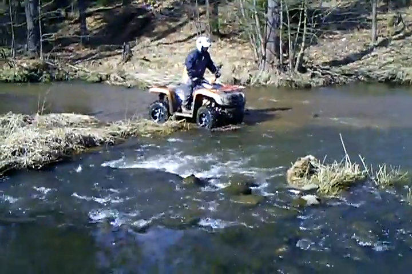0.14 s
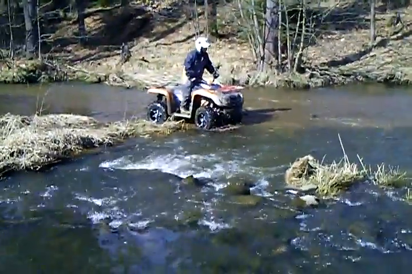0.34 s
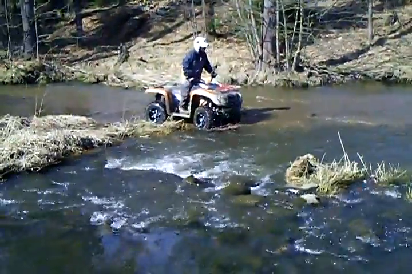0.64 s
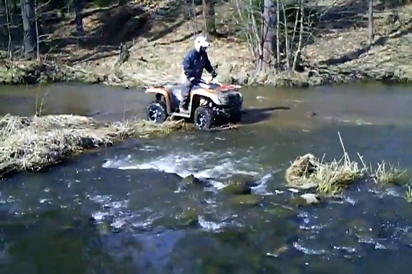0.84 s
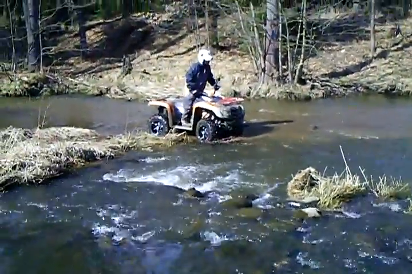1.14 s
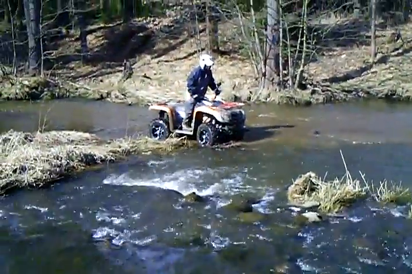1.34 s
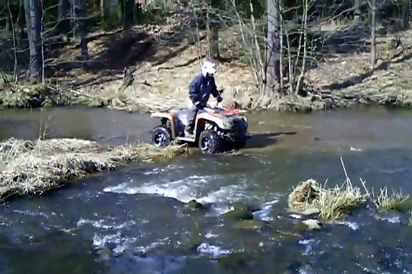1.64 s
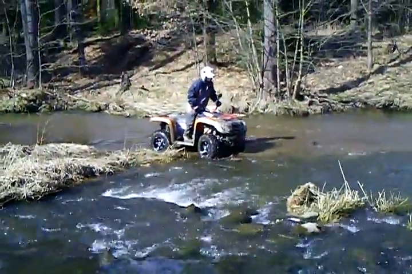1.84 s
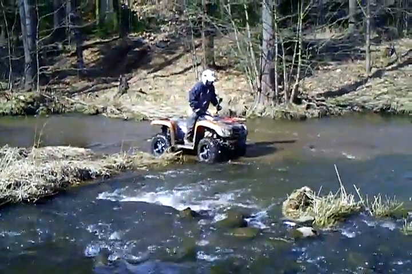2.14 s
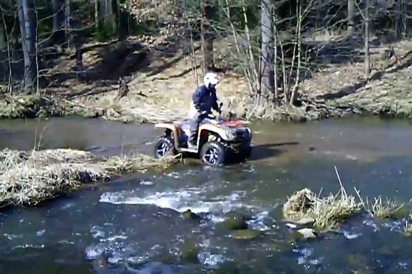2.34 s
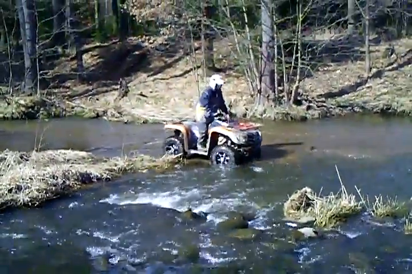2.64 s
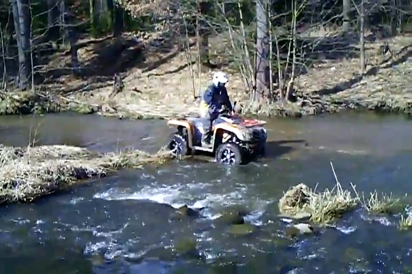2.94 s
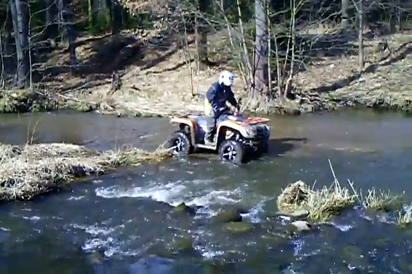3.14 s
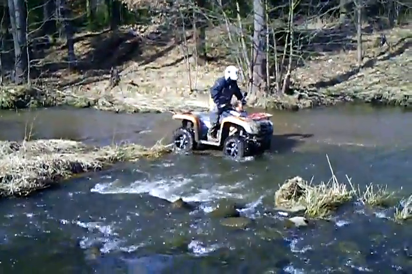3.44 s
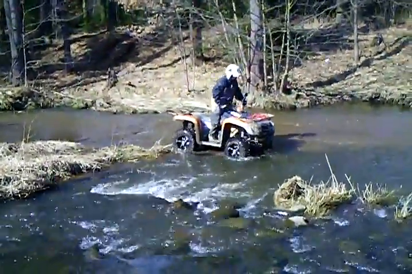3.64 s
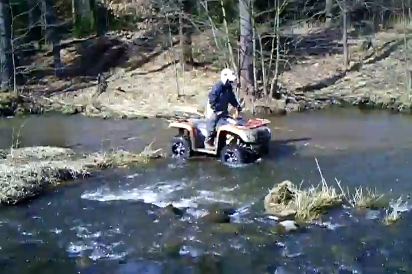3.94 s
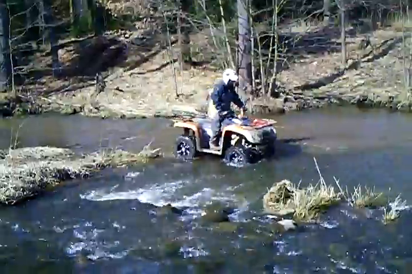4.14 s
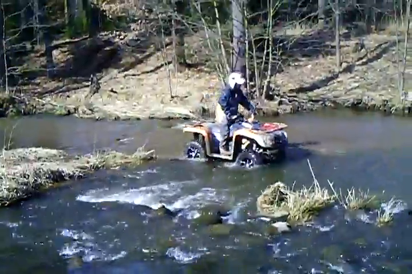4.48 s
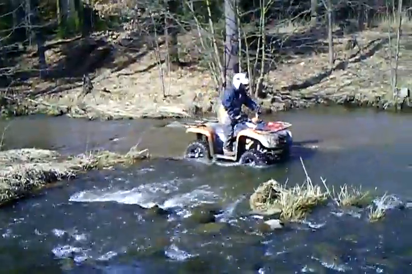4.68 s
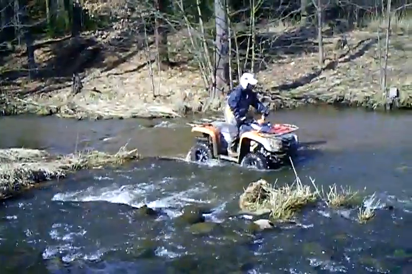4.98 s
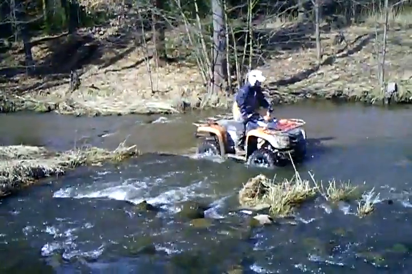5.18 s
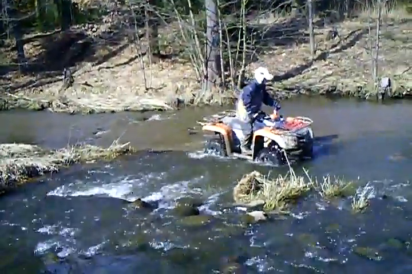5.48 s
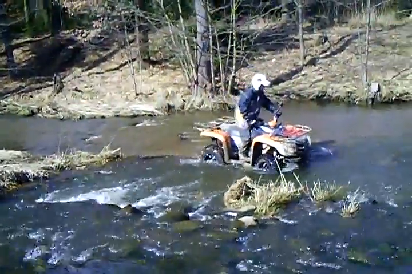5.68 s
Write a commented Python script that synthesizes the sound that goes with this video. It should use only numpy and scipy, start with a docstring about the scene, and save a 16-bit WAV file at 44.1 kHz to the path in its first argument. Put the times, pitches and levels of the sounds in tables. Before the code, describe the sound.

A shallow woodland stream rushes throughout, a wide, patchy wash strongest in the low mids, with rising bubbly gurgles and fine bright spray. Beneath it, a wavering low rumble and two slow idles at about 11 to 13 firings per second beat against each other, the nearer ticking softly each cycle. A single-cylinder quad putters at about 12 firings per second, then opens up from 1.2 to 2.75 s, booming and barking at about 17 with loose clatter. It sinks to idle near 3.2 s, pulls again from 3.7 to 4.7 s at up to nearly 20, drops back around 5.3 s and surges from 5.7 s as the sound ends. A faster, more distant engine blips faintly at 1.6 s, then strongly at 2.0-2.3 and 2.7-3.1 s, with nasal rasps. Tiny high water pings begin at 1.3 s, clustering from 2.7 to 4.5 s. Mono, outdoors, with the extreme treble rolled off.

```python
"""A stream rushes, gurgles and sprays over stones throughout: coloured noise and rising bubble chirps.
Idling engines rumble low underneath (low noise), and two quads idle on the bank from the start, one
ticking: pressure pulses through exhaust resonances. A single-cylinder quad crawls through the water,
its throttle opening near 1.2, 3.7 and 5.7 s. A fourth, faster engine further off is blipped between
1.5 and 3.1 s, rasping in bursts. Water spatters ping from 1.3 s, mostly after 2.6 s: decaying sines."""
import sys
import numpy as np
from scipy import signal
from scipy.fft import rfft, irfft, next_fast_len
from scipy.io import wavfile
from scipy.ndimage import uniform_filter1d, map_coordinates

SR = 44100
rng = np.random.default_rng(int(sys.argv[2]) if len(sys.argv) > 2 else 0)


def voltage_ratio(decibels):
    """Convert decibels (scalar or array-like) to amplitude ratios, 20 dB per decade."""
    exponent = np.asarray(decibels, float) / 20
    return 10 ** exponent


def wrap_up_sound(samples):
    """Save the sound to the file named by the first command line argument, as 16-bit audio."""
    columns = np.atleast_2d(samples).T
    # keep every value between -1 and 1, then stretch to whole-number steps
    tamed = np.clip(columns, -1, 1)
    steps = np.round(tamed * 32767).astype(np.int16)
    wavfile.write(sys.argv[1], SR, steps)


N = 256320

# stream wash, swelling as the quad wades deeper and nearer: time_s, level_db (before surges)
WASH = [(0, -41), (1.6, -41), (2.4, -39.5), (3.6, -40.5), (4.8, -39.5), (5.81, -40)]
# noise colours: frequency_hz, relative density_db (per Hz)
STREAM_COLOUR = [(100, -36), (170, -2.5), (250, 2.5), (330, -1), (420, -4), (600, -2), (780, -2),
                 (1000, -5.5), (1250, -4.5), (1550, -12), (2600, -12), (3050, -14.5), (3350, -20),
                 (6500, -21), (9800, -20), (12500, -21.5)]
ENGINE_RUMBLE_COLOUR = [(3, -18), (16, -8), (38, -8), (70, -5), (95, 0), (130, -3), (160, -14), (220, -40)]
TICK_COLOUR = [(200, -18), (350, 10), (600, -6), (1500, -8.5), (3500, -22), (6000, -13), (10000, -29),
               (12500, -23)]
RASP_COLOUR = [(250, -28), (350, -0.5), (520, -6.5), (720, 7), (1000, -9), (1600, -12), (2250, -4),
               (2900, -9.5), (3400, -18), (6000, -24), (12500, -19)]
CLATTER_COLOUR = [(250, -44), (400, -5), (750, 1), (1300, -3.5), (1600, -7), (2600, -5.5), (3400, -14),
                  (6000, -17.5), (10000, -18), (12500, -20)]
# sharp spatters of water: start_s, level_db (before onset and decay), pitch_hz
SPATTERS = [(1.299, -39, 6350), (1.3838, -38, 6240), (2.6828, -33, 6160), (3.0306, -36, 7340),
            (3.2277, -38, 9400), (3.3613, -38, 8420), (3.4645, -30, 7240), (3.6844, -28.5, 8900),
            (4.176, -32, 7240), (4.3087, -31, 9560), (4.4618, -34, 9880), (4.5237, -30, 10000),
            (5.244, -34, 6130), (5.675, -39, 9500)]
# engine speeds: time_s, firings_per_s
IDLER_NEAR_SPEED = [(0.0, 11.11), (0.8, 11.74), (2.81, 11.43), (3.41, 11.77), (4.01, 11.58), (4.21, 12.04),
                    (4.81, 11.5), (5.01, 12.22), (5.81, 10.68)]
IDLER_FAR_SPEED = [(0.0, 13.22), (0.8, 12.93), (2.0, 13.34), (2.2, 13.06), (3.21, 13.62), (4.01, 12.88),
                   (4.21, 13.53), (5.81, 13.39)]
BLIP_SPEED = [(1.3, 23), (1.6, 26), (1.92, 26.3), (2.04, 29.2), (2.17, 29.8), (2.31, 35.2), (2.45, 33.5),
              (2.6, 28), (2.7, 24.8), (2.83, 33), (2.93, 35.7), (3.0, 33.8), (3.12, 27.6), (3.3, 22.5)]
CRAWLER_SPEED = [(0.0, 11.91), (0.71, 11.74), (0.99, 12.67), (1.28, 16.24), (1.56, 17.51), (2.27, 17.73),
                 (2.55, 17.24), (2.98, 13.83), (3.26, 13.02), (3.54, 13.65), (3.97, 18.68), (4.25, 18.14),
                 (4.68, 19.54), (4.96, 17.58), (5.1, 13.81), (5.39, 11.51), (5.81, 16.83)]
# exhaust resonances: centre_hz, width_hz (of each of two passes), gain_db, polarity (signed factor on the gain)
PIPE_NEAR = [(58, 56.7, -35, -0.93), (107.2, 18.5, -31.5, 0.95)]
PIPE_FAR = [(57.4, 40.5, -36, -1.08), (113.2, 47.5, -38.5, 0.97)]
PIPE_BLIP = [(68, 82, -8, -1.02), (144.8, 44, 1.5, 1), (217, 40, -10.5, -1.06)]
PIPE_CRAWLER = [(97.3, 23.3, 0.3, 1), (179.7, 35, -1.74, 0.95), (273, 41, -12.5, 0.93), (323.4, 33, -18, 1)]
# throttle openings: open_s, close_s, opening_level_db, closing_level_db
BLIPS = [(1.55, 1.85, -39, -38.5), (1.98, 2.33, -31.5, -33), (2.7, 3.1, -30, -31.5)]
CRAWLER_THROTTLE = [(1.17, 2.75, -31, -33.5), (3.7, 4.74, -29.5, -30.5), (5.7, 5.81, -31.5, -28.5)]
# rasp bursts when the blipped engine pulls hard: peak_s, peak_db
RASP_BURSTS = [(2.0, -40.5), (2.3, -43.5), (2.82, -39)]
# microphone treble roll-off: frequency_hz, gain_db
MICROPHONE = [(9800, 0.5), (10500, -2), (11300, -11.5), (12100, -20), (12500, -40)]


def unit(x):
    """Scale to rms 1."""
    return x / np.sqrt(np.mean(x ** 2) + 1e-20)


def curves(rows):
    """One value per sample for each column after the time."""
    time_s, *columns = np.transpose(rows)
    return [np.interp(np.arange(N) / SR, time_s, column) for column in columns]


def wobble(knots_per_s):
    """A smooth random curve through normal random knots."""
    knots = rng.standard_normal(int(N * knots_per_s / SR) + 4)
    return map_coordinates(knots, [np.arange(N) * knots_per_s / SR])


def filtered(x, response):
    """x times a complex response of frequency."""
    size = next_fast_len(N + SR // 2)
    return irfft(rfft(x, size) * response(np.fft.rfftfreq(size, 1 / SR)), size)[:N]


def noise(colour, patchy_db):
    """Coloured noise of rms 1 with random gain patches in time and frequency."""
    bins = signal.stft(rng.standard_normal(N), nperseg=512)[2]
    patches = uniform_filter1d(rng.standard_normal(bins.shape), size=6, axis=0)
    patches = uniform_filter1d(patches, size=8, axis=1)
    patchy = signal.istft(bins * voltage_ratio(patchy_db * unit(patches)), nperseg=512)[1][:N]
    hz, db = np.transpose(colour)

    def response(f):
        return voltage_ratio(np.interp(np.log(f + 1), np.log(hz + 1), db, left=-120, right=-120))

    return unit(filtered(patchy, response))


def openings(rows, idle_db, rise_db_per_s, fall_db_per_s):
    """Throttle level in dB: rises to each opening, runs to its closing level, falls back to idle."""
    t = np.arange(N) / SR
    held_db = []
    for open_s, close_s, open_db, close_db in rows:
        level_db = np.interp(t, [open_s, close_s], [open_db, close_db])
        level_db = level_db - rise_db_per_s * np.maximum(open_s - t, 0)
        held_db.append(level_db - fall_db_per_s * np.maximum(t - close_s, 0))
    return np.maximum(np.max(held_db, axis=0), idle_db)


def exhaust(rate, first, pipe, level_db):
    """One pressure pulse per firing, the first at a share of the cycle, through steep pipe resonances."""
    jitter_s, scatter_db = .00015, .9  # rms
    cycle = np.floor(np.cumsum(rate) / SR - first)
    fired = np.flatnonzero(np.diff(cycle) > 0)
    chance = rng.standard_normal((len(fired), 2))
    at = fired + np.round(jitter_s * SR * chance[:, 0]).astype(int)
    at = np.clip(at, 0, N - 1)
    pulse_db = (level_db + np.zeros(N))[fired] + scatter_db * chance[:, 1]
    pulse = voltage_ratio(pulse_db) * SR / (2 * rate[fired])  # faster firing, smaller pulses

    def ring(f):
        total = 0
        for hz, width_hz, gain_db, polarity in pipe:
            band = 1j * f * width_hz / (hz * hz - f * f + 1j * f * width_hz)
            total = total + polarity * voltage_ratio(gain_db) * band ** 2
        return total

    return filtered(np.bincount(at, pulse, N), ring)


def gate(rate, centre, sharp):
    """A bump once per firing cycle, centred at a share of the cycle; rms 1."""
    phase = 2 * np.pi * (np.cumsum(rate) / SR - centre)
    return unit(np.exp(sharp * np.cos(phase)))


def bubbles(count, centre_hz, spread, cycles, size_db):
    """Small decaying chirps of trapped air, rising in pitch; rms 1."""
    draw, pick = rng.standard_normal((count, 2)), rng.random((count, 2))
    hz = np.clip(centre_hz * np.exp(spread * draw[:, :1]), 200, 11000)
    k = np.arange(700)
    turn = k * hz / SR
    chirp = np.sin(2 * np.pi * turn * (1 + 0.11 * turn / cycles))
    grain = chirp * turn * np.exp(-3 * turn / cycles)
    grain *= voltage_ratio(-size_db * np.log(1 - pick[:, :1]))  # a few much louder
    at = (pick[:, 1:] * N).astype(int) + k
    return unit(np.bincount(at.ravel(), grain.ravel(), N + len(k))[:N])


def spatters():
    """Drops hitting stone or metal: a ping of a few milliseconds."""
    onset_s, decay_60db_s = 0.00042, 0.0069
    out, t = np.zeros(N + SR), np.arange(400) / SR
    for start_s, level_db, pitch_hz in SPATTERS:
        envelope = voltage_ratio(level_db - 60 * t / decay_60db_s) * (1 - np.exp(-t / onset_s))
        out[round(start_s * SR):][:len(t)] += envelope * np.sin(2 * np.pi * pitch_hz * t)
    return out[:N]


def stream():
    """A wide patchy rush of water with bubbles, fine spray and spatters on it."""
    surge_db = .15 * wobble(1.5) + .3 * wobble(12) + .7 * wobble(60)
    rush = voltage_ratio(curves(WASH)[0] + surge_db) * noise(STREAM_COLOUR, patchy_db=0.22)
    gurgle = voltage_ratio(-54) * bubbles(count=4000, centre_hz=1300, spread=.6, cycles=5, size_db=1.8)
    spray = voltage_ratio(-58) * bubbles(count=1500, centre_hz=9000, spread=.18, cycles=5, size_db=2.5)
    return rush + gurgle + spray + spatters()


def engine_rumble():
    """Low rumble of distant idling engines, as slowly wavering noise strongest near 95 Hz."""
    return voltage_ratio(-39.5 + wobble(3)) * noise(ENGINE_RUMBLE_COLOUR, patchy_db=1)


def idlers():
    """Two steady idles beat against each other; the nearer one ticks once a cycle."""
    (near,), (far,) = curves(IDLER_NEAR_SPEED), curves(IDLER_FAR_SPEED)
    thump = exhaust(near, .844, PIPE_NEAR, level_db=0)
    thump += exhaust(far, .473, PIPE_FAR, level_db=0)
    tick_db = -52 + 0.9 * wobble(12)
    tick = voltage_ratio(tick_db) * gate(near, centre=.99, sharp=29) * noise(TICK_COLOUR, patchy_db=1.5)
    return thump + tick


def blipped():
    """A faster engine revs up and falls back; it rasps in bursts while it pulls."""
    rate, = curves(BLIP_SPEED)
    level_db = openings(BLIPS, idle_db=-53, rise_db_per_s=70, fall_db_per_s=36)
    bursts = [(peak_s, peak_s, peak_db, peak_db) for peak_s, peak_db in RASP_BURSTS]
    rasp_db = openings(bursts, idle_db=-np.inf, rise_db_per_s=120, fall_db_per_s=58)
    rasp = voltage_ratio(rasp_db) * gate(rate, centre=0, sharp=0.33) * noise(RASP_COLOUR, patchy_db=0.5)
    return exhaust(rate, 0, PIPE_BLIP, level_db) + rasp


def crawler():
    """More throttle gives harder firings and more clatter; the lowest resonance keeps booming at idle."""
    rate, = curves(CRAWLER_SPEED)
    level_db = openings(CRAWLER_THROTTLE, idle_db=-51, rise_db_per_s=68, fall_db_per_s=49)
    first = .113  # share of the cycle
    closed_db = level_db - np.max(level_db)  # 0 at the widest opening, negative elsewhere
    boom = exhaust(rate, first, PIPE_CRAWLER[:1], level_db - 0.31 * closed_db)
    bark = exhaust(rate, first, PIPE_CRAWLER[1:], level_db)
    clatter_db = -45.5 + 0.42 * closed_db + 1.5 * wobble(18)
    clatter = gate(rate, centre=.33, sharp=0.35) * noise(CLATTER_COLOUR, patchy_db=1.5)
    return boom + bark + voltage_ratio(clatter_db) * clatter


def scene():
    """The water and all engines, summed to one channel."""
    return (stream() + engine_rumble() + idlers() + blipped() + crawler())[None]


def low_pass(x):
    """Removes everything above the highest recorded frequency."""
    return signal.sosfilt(signal.butter(12, 12230, fs=SR, output="sos"), x)


def record(dry):
    """One microphone rolls off the top treble."""
    hz, db = np.transpose(MICROPHONE)
    heard = filtered(dry[0], lambda f: voltage_ratio(np.interp(f, hz, db)))
    return low_pass(heard[None])


dry = scene()
out = record(dry)
wrap_up_sound(out)
```